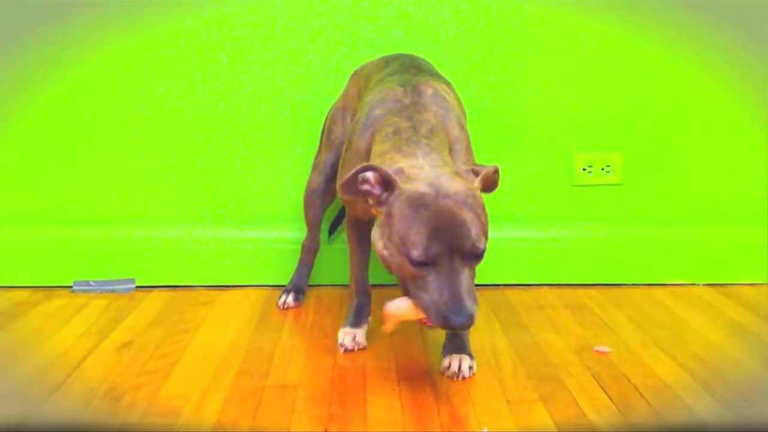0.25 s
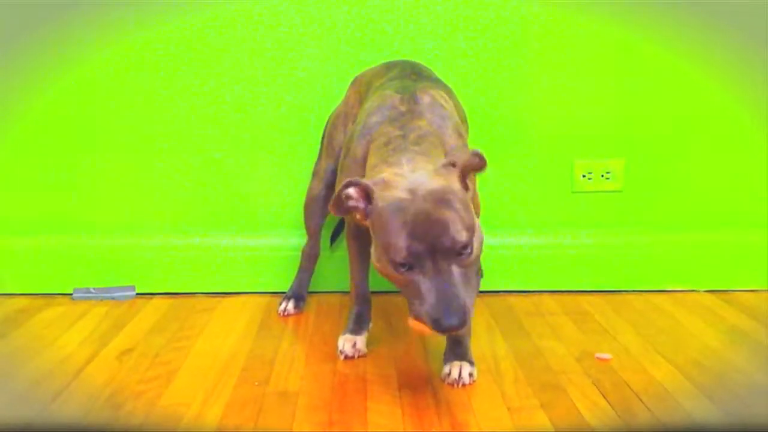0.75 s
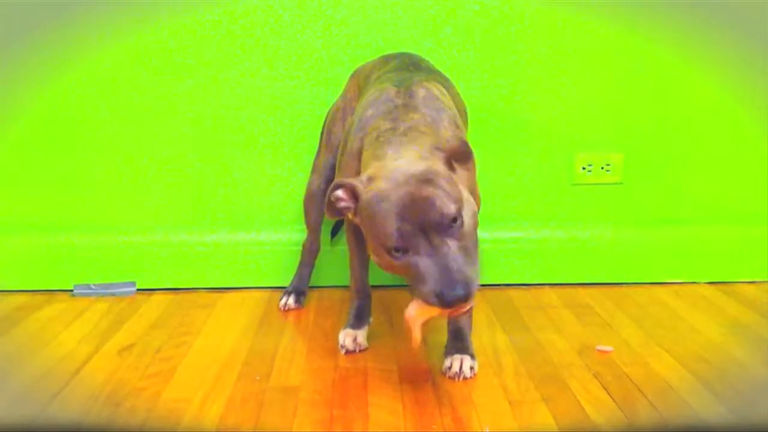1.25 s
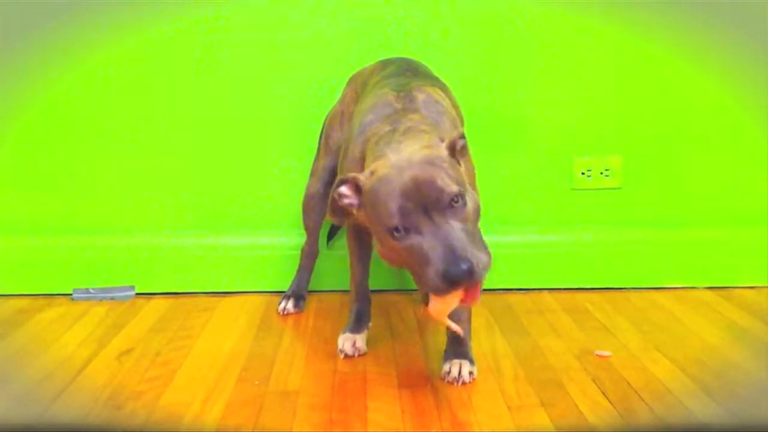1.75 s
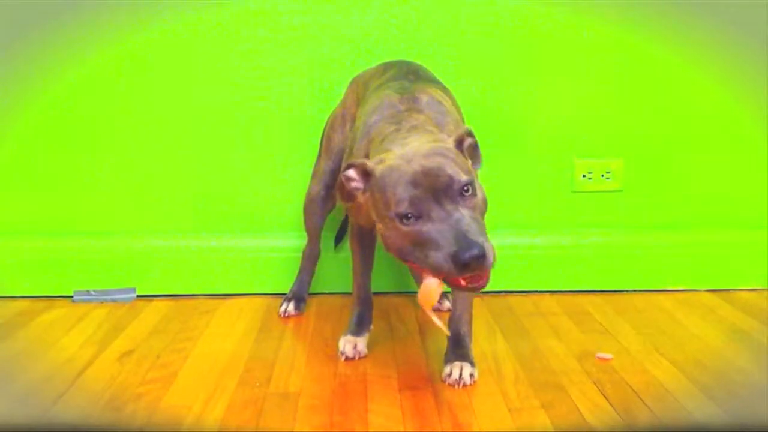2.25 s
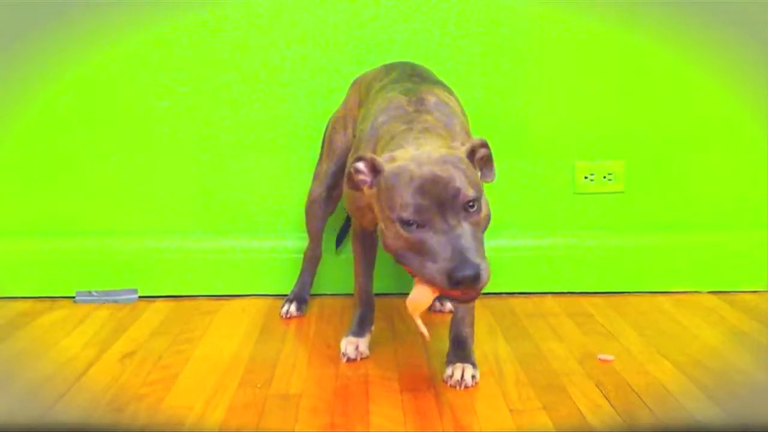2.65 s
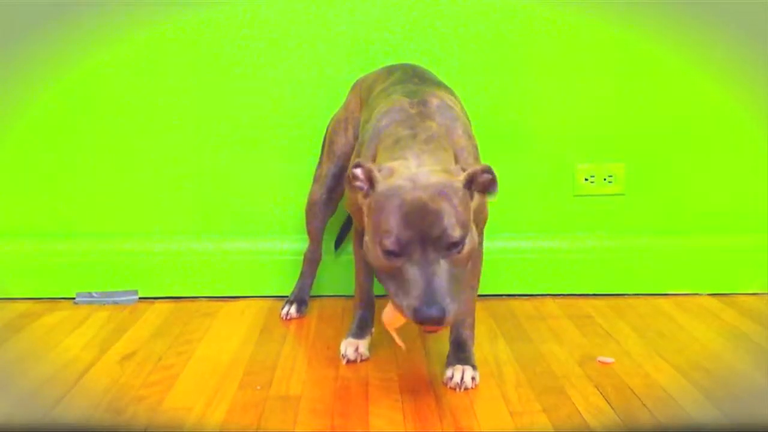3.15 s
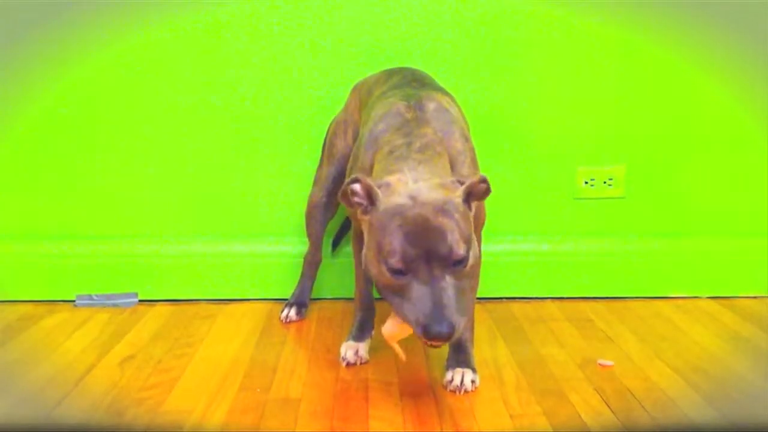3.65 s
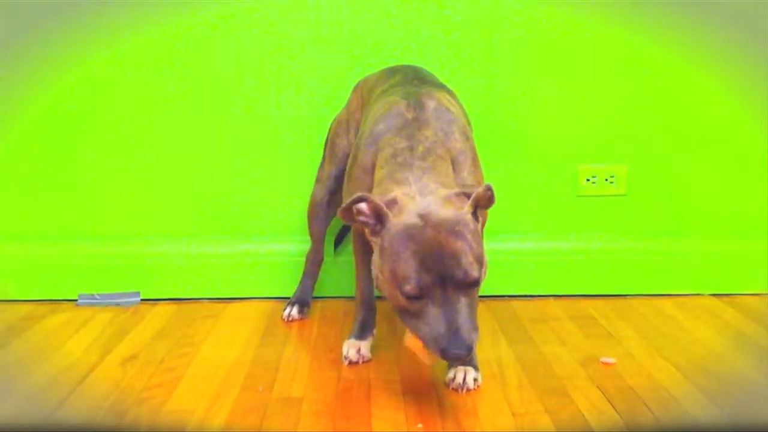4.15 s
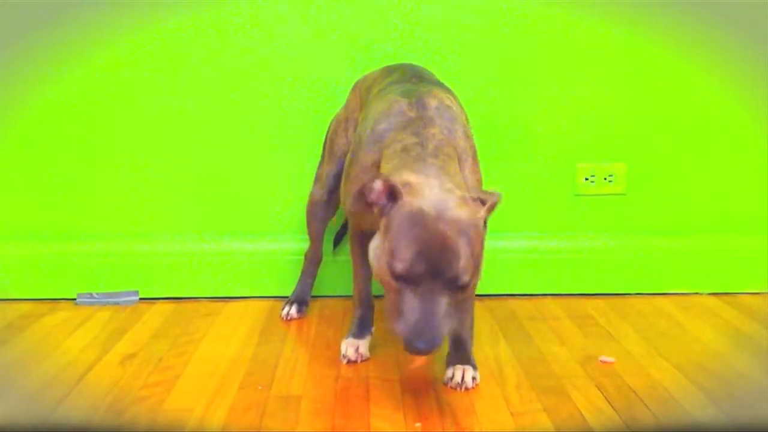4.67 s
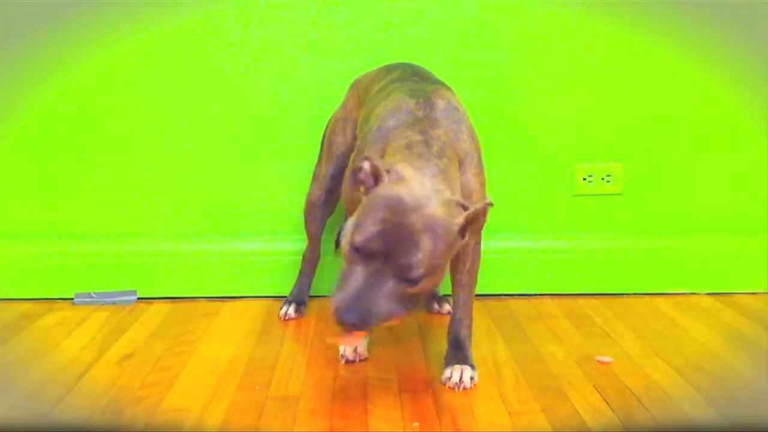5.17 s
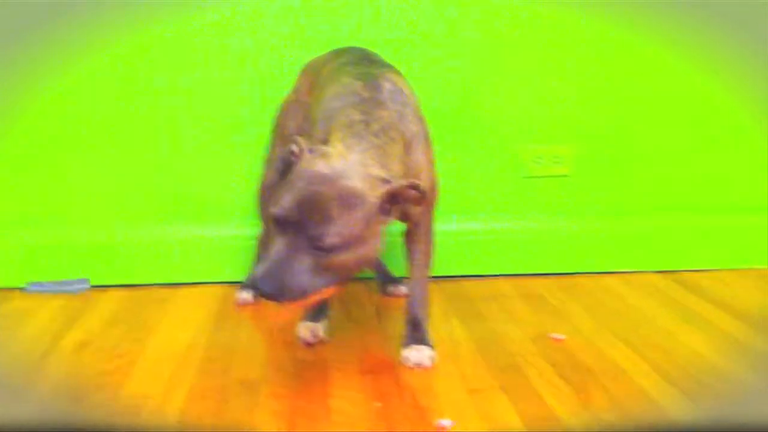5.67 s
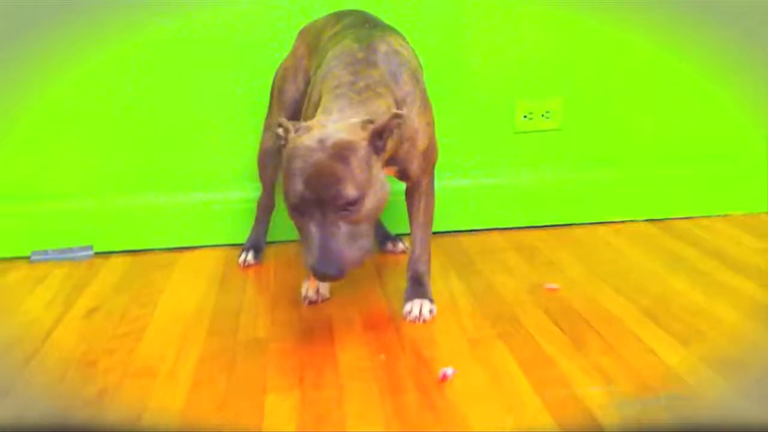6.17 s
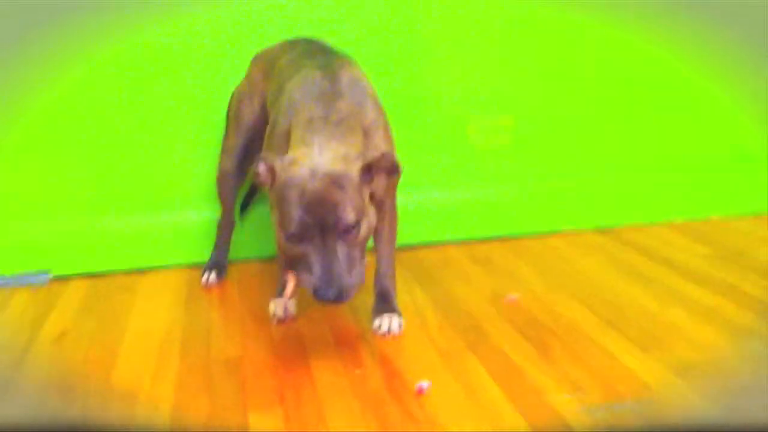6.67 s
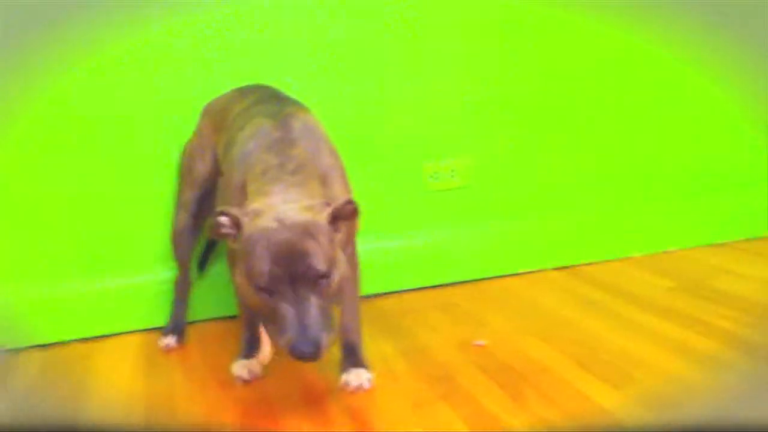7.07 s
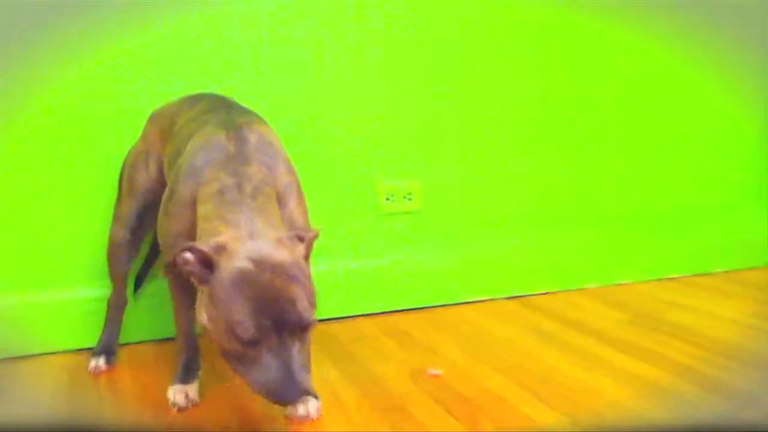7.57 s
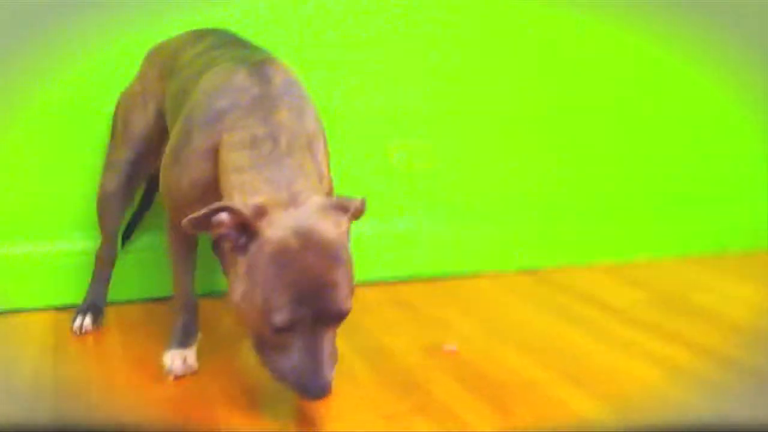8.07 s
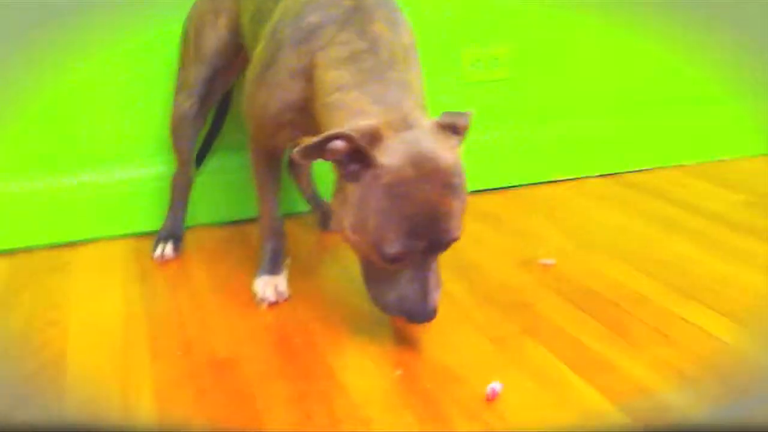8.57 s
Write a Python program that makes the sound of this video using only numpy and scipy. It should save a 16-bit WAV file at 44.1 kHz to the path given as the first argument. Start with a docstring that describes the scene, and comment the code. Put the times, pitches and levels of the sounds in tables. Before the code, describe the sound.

Irregular wet smacks, lip clicks and crackling bone come from a dog eating raw chicken indoors, each bite ringing briefly off bare walls. A few faint nose whistles slip in, then two much harder crunches. The hand-held microphone is bumped repeatedly and rustles as the last bites follow. A faint electrical hum and hiss lie underneath throughout.

```python
"""A dog chews raw chicken on a wooden floor in a bare room. From the start, bones crack, wet jaws
smack and the walls ring on, over mains hum and a soft hiss. After about 3 s, air faintly whistles
and squeaks in the dog's nose. Near 5 s the hand-held camera is first knocked, and the hardest bites
follow at 5.4 and 6.7 s. From 6 s the camera is knocked again and again and rustles in the hand.
The last bite comes near 8 s, and an airy hiss swells at the end."""
import sys
import numpy as np
from scipy import signal
from scipy.fft import rfft, irfft, next_fast_len
from scipy.io import wavfile
from scipy.ndimage import uniform_filter1d, map_coordinates

SR = 44100
rng = np.random.default_rng(int(sys.argv[2]) if len(sys.argv) > 2 else 0)


def master_out(mix):
    """Clip the mix to full scale and print it as 16-bit PCM to the path in sys.argv[1]."""
    frames = np.transpose(np.atleast_2d(mix))
    ceiling = np.clip(frames, -1, 1)
    pcm = np.round(ceiling * 32767).astype(np.int16)
    wavfile.write(sys.argv[1], SR, pcm)


N = 388962

# cracks and smacks of chewing, and one dry scuff of the hand on the camera at 6.52 s:
# (time [s], mouth peak [dB], mouth pitch [Hz], jaw peak [dB], jaw pitch [Hz],
# splinter peak [dB], splinter pitch [Hz], relative echo level [dB], crackle length [ms])
CRACKLES = [(0.004, -41, 1610, -40.5, 1220, -31, 5060, -6, 12),
            (0.174, -45, 1720, -70, 620, -45, 7060, 0, 5.6),
            (0.287, -56, 3380, -63, 1220, -59, 4940, 13.5, 7.5),
            (0.345, -47, 2080, -47, 1330, -45, 6560, 3, 3.6),
            (0.659, -51, 1820, -75, 1125, -66, 4580, 9, 2.4),
            (0.7895, -36.5, 1550, -60, 920, -45.5, 6400, 3.5, 8.4),
            (0.821, -38, 1500, -36.5, 1300, -54, 6440, -2.5, 43),
            (0.952, -40, 2370, -68, 1200, -66, 4700, -2, 4.4),
            (1.183, -54.5, 3080, -62.5, 764, -54.5, 3600, 7, 17),
            (1.317, -50, 2900, -78, 1320, -49, 4700, 5.5, 8),
            (1.547, -64, 2360, -57, 1040, -48.5, 4330, 0.5, 21),
            (1.584, -57, 2400, -61, 880, -48.5, 3700, 5.5, 12),
            (1.764, -58, 1740, -59, 1030, -51.5, 4300, 1, 13),
            (1.795, -42.5, 1640, -62, 1250, -65, 4290, -1, 8.9),
            (1.919, -47.5, 1920, -60, 776, -41.5, 3620, 5.5, 12.5),
            (1.949, -50, 2100, -56, 1200, -45, 3600, -1, 5.3),
            (1.996, -44, 2560, -49.5, 1300, -43.5, 4300, 4.5, 8.8),
            (2.154, -42, 2020, -66, 1190, -46, 3530, -0.5, 7.2),
            (2.208, -47, 1950, -73, 750, -69, 3960, 2.5, 7.6),
            (2.239, -48, 1970, -64, 1300, -42.5, 3420, 6.5, 2.5),
            (2.402, -60, 2046, -50.5, 1030, -40.5, 3780, 8.5, 6.3),
            (2.412, -34, 1890, -51, 960, -46.5, 6900, -3.5, 14),
            (2.472, -62, 2090, -73, 1290, -50, 3940, -15, 6),
            (2.531, -66, 2110, -72, 1040, -49.5, 4300, 1, 10),
            (2.607, -38.5, 1910, -50.5, 940, -41, 4600, 1, 4.7),
            (2.703, -39, 1900, -62, 870, -51, 4600, -4, 14),
            (2.842, -46.5, 1840, -67, 750, -37, 4300, 1, 9.8),
            (2.848, -39.5, 1690, -57, 720, -46, 5470, 0, 7.8),
            (2.94, -51.5, 2000, -75, 770, -45, 4000, 9.5, 3.9),
            (2.994, -54, 2300, -55.5, 1300, -49.5, 3540, 5.5, 16),
            (3.036, -45, 2260, -77, 1250, -53, 6530, -7, 8.7),
            (3.076, -63, 2310, -74, 770, -50, 6530, 5, 8.1),
            (3.129, -39, 2200, -62, 960, -42.5, 4540, -3.5, 13),
            (3.473, -53.5, 2250, -60, 1260, -57, 5000, 7.5, 7.7),
            (3.581, -45, 2330, -73, 1250, -43.5, 5040, 4.5, 6.4),
            (3.734, -43, 3210, -53.5, 1200, -44.5, 4400, 5, 7.2),
            (3.892, -56, 2290, -70, 1200, -48, 4360, 6, 4.3),
            (3.945, -41.5, 2290, -50, 845, -44, 4830, 4, 3.7),
            (4.055, -54, 2340, -67, 1250, -61, 4800, 12, 5),
            (4.078, -49, 2470, -54, 1250, -50, 5040, 2, 5.5),
            (4.22, -41, 2110, -47.5, 1220, -44, 3600, 2.5, 10.3),
            (4.398, -28, 1870, -34.5, 865, -31.5, 4410, 4.5, 4),
            (4.461, -37, 1750, -37.5, 740, -35.5, 3630, 1, 5.4),
            (4.692, -45.5, 2000, -73, 685, -51, 4450, 3.5, 11),
            (4.766, -46.5, 2700, -43, 1270, -72, 4760, 6.5, 2.1),
            (4.823, -44, 2120, -39, 1080, -45.5, 4770, -10, 18),
            (4.856, -33.5, 1970, -31, 1270, -37.5, 4900, 3.5, 4.9),
            (5.027, -47, 2350, -48, 1250, -68, 4690, 2, 41), (5.385, -45, 1920, -66, 858, -41, 3550, 5, 6),
            (5.404, -33.5, 2230, -46, 860, -37, 3480, -6, 9.5),
            (5.4343, -21, 2130, -26.5, 1270, -19.5, 3800, -5, 12),
            (5.446, -22, 2430, -22.5, 1390, -28.5, 4900, -1, 9.6),
            (5.5126, -33, 1500, -33, 860, -32, 3340, 1.5, 6.7),
            (5.642, -50, 2640, -43, 1370, -44.5, 4200, 5.5, 5.4),
            (5.707, -71, 3180, -50, 1200, -39.5, 4300, -6, 15),
            (5.916, -42, 2550, -51, 1030, -44, 4700, -1, 5.8),
            (5.929, -32, 2400, -48, 1030, -42, 6050, -7.5, 6.5),
            (5.983, -48, 2400, -60, 1100, -44, 4820, -2, 3),
            (6.077, -44, 2400, -60, 1300, -45, 4850, -8, 3),
            (6.019, -35, 2340, -49, 1380, -41.5, 4000, -4, 26),
            (6.119, -34.5, 2560, -39, 1280, -35, 4570, -7, 11),
            (6.52, -42.5, 1760, -40.5, 830, -46, 4720, -22, 33),
            (6.558, -44.5, 1820, -61, 1260, -54, 4970, 3, 29),
            (6.688, -41, 2310, -44, 1290, -41, 5030, -17, 11),
            (6.702, -46, 2260, -55, 1270, -39, 5190, -14, 5.1),
            (6.73, -20.5, 1790, -32, 1400, -19.5, 3570, 0, 6.2),
            (6.741, -32, 1700, -35, 1200, -37, 4960, -9, 4.8),
            (6.755, -33, 1770, -53, 1410, -40, 5100, -5, 17),
            (6.901, -35, 1850, -59, 766, -52, 6030, -0.5, 39),
            (7.183, -41, 2430, -47.5, 1000, -44.5, 5000, 0, 7.4),
            (7.29, -45, 1830, -48.5, 740, -53, 5060, 2, 8.2),
            (7.388, -33.5, 1900, -41, 660, -34.5, 4700, 5, 8.7),
            (7.415, -22.5, 2270, -39, 646, -27.5, 4730, -6.5, 3.2),
            (7.415, -31, 2210, -62, 680, -44, 4800, -4.5, 43),
            (7.577, -55, 2524, -54, 1430, -44.5, 5900, 6, 6.7),
            (7.621, -47, 1710, -40, 1390, -58, 4080, 0, 4.5),
            (7.753, -41, 2320, -46, 1450, -47.5, 4900, 7, 8.5),
            (7.851, -62, 2350, -47, 930, -43, 4840, -10, 4.8),
            (7.956, -51, 2040, -56, 1010, -52, 5510, 4.5, 9.6)]
# bone between the teeth: (time [s], level [dB], pitch [Hz], time to fade 60 dB [s], echo gain [dB])
BONE_KNOCKS = [(0.174, -44, 2250, 0.018, 6.5), (0.174, -41, 7340, 0.0076, -8),
               (0.285, -51, 3800, 0.008, -8), (0.79, -34, 2290, 0.013, -7), (0.832, -34, 1505, 0.049, 0.5),
               (0.834, -34.5, 955, 0.056, -3), (1.501, -45, 2300, 0.007, -8), (1.55, -42, 4630, 0.005, -8),
               (1.565, -45, 4500, 0.005, -8), (1.586, -44, 2400, 0.006, -8), (1.652, -46, 2200, 0.006, -8),
               (1.746, -45, 1900, 0.008, -8), (1.768, -41, 4430, 0.0089, -7), (1.769, -44, 1900, 0.007, -6),
               (1.9225, -41, 3500, 0.006, -10), (1.922, -46, 1900, 0.007, -10),
               (1.9505, -37, 2150, 0.0072, -10), (2.008, -42, 2200, 0.005, -8),
               (2.008, -42, 4400, 0.005, -10), (2.1554, -37, 1970, 0.0083, -8),
               (2.209, -46, 1850, 0.009, -8), (2.24, -35, 2010, 0.0094, -11),
               (2.4022, -31.5, 4300, 0.0088, -9), (2.412, -38, 2090, 0.037, -6),
               (2.607, -36, 1990, 0.01, -16), (2.7035, -33.5, 2250, 0.016, -4),
               (2.718, -42, 2300, 0.01, -8), (2.8423, -40, 4680, 0.014, -13),
               (2.848, -42, 1800, 0.007, -10), (2.941, -38, 4370, 0.0087, -6),
               (3.037, -46, 2300, 0.008, -10), (3.129, -43, 2120, 0.018, -10),
               (3.592, -43, 2300, 0.0088, -10), (3.592, -42, 5200, 0.005, -8), (3.706, -47, 3750, 0.01, -4),
               (3.729, -37, 3730, 0.014, 3), (3.85, -47, 4800, 0.004, -10), (3.893, -42, 4500, 0.005, -10),
               (3.734, -40, 2340, 0.024, 0), (3.945, -40, 2250, 0.031, -10), (4.397, -31, 871, 0.045, -1),
               (4.398, -51, 230, 0.052, -2), (4.41, -37, 1775, 0.039, 0), (4.461, -30, 1800, 0.012, -10),
               (4.61, -43, 4430, 0.0087, -8), (4.6915, -39, 4150, 0.009, -4),
               (5.4341, -18, 830, 0.016, -10), (5.4349, -35, 360, 0.061, -4), (5.4468, -34, 424, 0.022, -4),
               (5.4358, -17, 3510, 0.015, -0.5), (5.4475, -28.5, 1343, 0.033, 0.5),
               (5.448, -28, 2380, 0.02, -5), (5.642, -34.5, 3450, 0.016, -1),
               (5.7108, -34, 3960, 0.016, -7), (5.7095, -39, 3480, 0.02, 6), (5.752, -41, 3630, 0.015, -6),
               (5.801, -48, 1500, 0.006, -13), (6.7292, -21, 750, 0.011, -5),
               (6.7292, -19, 2310, 0.015, -5.5), (6.736, -31, 340, 0.025, -14),
               (6.745, -20, 5260, 0.015, -6), (6.758, -22, 5600, 0.0065, -2),
               (7.417, -28.5, 1642, 0.058, 2), (7.428, -25.5, 1747, 0.036, 1),
               (7.002, -40, 2300, 0.005, -12), (7.753, -33, 2150, 0.017, -3)]
# wet clicks at the lips: (time [s], relative click level [dB], relative sizzle level [dB])
LIP_CLICKS = [(0.1724, -47, -61), (0.2854, -59, -60), (0.6631, -64, -74), (0.714, -57, -64),
              (0.7698, -50, -54.5), (0.949, -59, -65), (1.269, -57, -62), (1.322, -55, -59),
              (1.5266, -56, -64), (1.563, -54, -59), (1.9172, -59, -76), (1.9297, -58, -73),
              (2.017, -54, -59), (2.157, -50, -57.5), (2.24, -58, -64), (2.3273, -60, -66),
              (2.4025, -59, -61), (2.4136, -51, -65), (2.5009, -50, -60), (2.5308, -55, -64),
              (2.606, -51, -58), (2.8431, -57, -69), (2.9578, -59, -68), (3.0731, -45, -67),
              (3.1105, -57, -67), (3.124, -55, -62), (3.5809, -57, -73), (3.7291, -58, -75),
              (3.9456, -56, -63), (4.0776, -57, -58.5), (4.3966, -34, -53), (4.66, -60, -62),
              (4.8221, -57, -76), (4.857, -39, -49), (5.3846, -35, -59), (5.4048, -41, -73),
              (5.4344, -20, -46), (5.512, -45, -66), (5.6402, -59, -71), (5.6773, -57, -61),
              (5.7096, -55, -60), (5.9286, -55, -74), (6.0074, -54, -60), (6.1182, -53, -72),
              (6.521, -51, -57), (6.688, -54, -55), (6.705, -38, -67), (6.729, -50, -58)]
# mouth rubs and hollow rings, low rustle, and a closing swell of airy hiss:
# (time [s], hold [s], pitch [Hz], width [Hz], level [dB])
HELD_NOISES = [(0.178, 0.04, 1570, 320, -57), (0.348, 0.019, 1270, 180, -57), (0.39, 0.04, 1300, 400, -72),
               (0.44, 0.091, 1260, 330, -64.5), (0.345, 0.12, 3800, 2500, -62.5),
               (0.31, 0.03, 2400, 1500, -64), (0.62, 0.024, 2000, 900, -70), (0.346, 0.037, 7100, 900, -62),
               (0.79, 0.018, 2200, 880, -43), (0.835, 0.063, 2070, 800, -48),
               (0.826, 0.061, 1050, 220, -57), (0.921, 0.14, 1620, 885, -59), (1.25, 0.06, 4560, 700, -64),
               (1.62, 0.047, 2200, 700, -62), (1.193, 0.32, 2250, 845, -63), (1.5, 0.16, 2210, 700, -63),
               (1.566, 0.1, 4300, 900, -65), (1.745, 0.045, 1780, 380, -59.5),
               (1.928, 0.052, 1790, 700, -58.5), (1.999, 0.11, 3230, 1250, -59.5),
               (3.39, 0.073, 3570, 800, -63), (2.41, 0.1, 2090, 250, -62), (2.705, 0.033, 2290, 250, -61),
               (3.475, 0.032, 3450, 700, -58), (3.741, 0.036, 3040, 300, -66),
               (3.85, 0.055, 2430, 800, -62), (3.945, 0.061, 2170, 300, -61),
               (4.414, 0.054, 334, 253, -56.5), (4.405, 0.12, 870, 130, -59), (4.41, 0.11, 1750, 220, -53),
               (4.43, 0.045, 198, 90, -57), (4.731, 0.028, 804, 400, -60), (4.86, 0.091, 4930, 500, -57),
               (4.906, 0.061, 304, 354, -59), (5.031, 0.059, 610, 500, -56), (5.081, 0.08, 3140, 900, -55),
               (5.101, 0.071, 5030, 600, -61), (5.204, 0.057, 2260, 1210, -57),
               (5.218, 0.038, 4480, 1000, -56), (5.303, 0.11, 390, 350, -52),
               (5.436, 0.045, 417, 444, -48.5), (5.315, 0.037, 1480, 910, -53.5),
               (5.44, 0.02, 760, 248, -42), (5.645, 0.026, 1400, 250, -55), (5.65, 0.04, 3400, 300, -60),
               (5.7, 0.039, 1300, 350, -55), (5.715, 0.03, 3600, 798, -53),
               (6.033, 0.029, 1400, 130, -55.5), (6.187, 0.046, 440, 400, -55.5),
               (6.24, 0.1, 340, 350, -61.5), (6.34, 0.14, 256, 298, -61.5), (6.735, 0.059, 3000, 1200, -42),
               (6.741, 0.065, 5100, 900, -42.5), (7.08, 0.045, 160, 150, -76),
               (7.188, 0.012, 2380, 500, -54), (7.265, 0.12, 1980, 900, -59), (7.45, 0.05, 1680, 450, -53),
               (7.777, 0.073, 2220, 1000, -54), (7.845, 0.011, 573, 600, -50.5),
               (7.931, 0.12, 256, 204, -63.5), (8.199, 0.058, 820, 350, -58), (8.244, 0.033, 350, 350, -55),
               (8.36, 0.47, 8400, 8000, -65.5)]
# ongoing noise of meat and hand: (time [s], squelch level [dB], rustle level [dB])
SQUELCH_AND_RUSTLE = [(0.0, -49.5, -59), (0.27, -63, -71), (0.73, -66.5, -70.5), (0.96, -59.5, -68),
                      (1.82, -65, -71), (2.06, -63, -71), (3.51, -63.5, -70), (3.76, -61.5, -72.5),
                      (4.05, -63.5, -68.5), (4.81, -59, -68), (4.96, -54, -58.5), (5.33, -54.5, -59.5),
                      (5.425, -62, -53), (5.46, -55, -57), (5.72, -58.5, -66), (6.09, -57, -57.5),
                      (6.66, -58.5, -60.5), (6.78, -42.5, -46.5), (7.0, -58.5, -60.5), (7.44, -51.5, -61),
                      (7.61, -60.5, -58), (8.13, -57, -59.5), (8.82, -54.5, -65.5)]
# tone colour of wet meat: (frequency [Hz], relative level [dB])
SQUELCH_COLOUR = [(350, -22), (600, -14.5), (1060, -11.5), (1230, -8.5), (1660, 2), (1960, 2), (2310, 3.5),
                  (2830, 0.5), (4680, -0.5), (7540, -9), (11500, -20.5), (12800, -45), (15500, -21)]
# whistles in the nose: (time [s], hold [s], pitch [Hz], width [Hz], level [dB])
NOSE_WHISTLES = [(3.412, 0.14, 1270, 83.33, -71), (3.879, 0.1, 1180, 110, -67),
                 (3.31, 0.017, 1240, 120, -66), (4.225, 0.03, 1150, 250, -64),
                 (4.271, 0.028, 1210, 130, -61), (5.757, 0.015, 1134, 110, -61)]
# squeaks in the nose: (time [s], length [s], first pitch [Hz], last pitch [Hz],
# relative level [dB], pitch waver [Hz])
NOSE_SQUEAKS = [(4.49, 0.11, 4430, 4230, -64, 40), (4.615, 0.065, 4130, 4040, -67, 70),
                (6.272, 0.076, 4270, 4240, -63.5, 6)]
# knocks on the camera: (time [s], thump peak [dB], thump pitch [Hz], damping [per cycle], tick peak [dB])
CAMERA_KNOCKS = [(4.913, -51, 129, 1.3, -38), (6.2082, -52, 500, 2.4, -44), (6.243, -58, 600, 2.4, -46),
                 (6.272, -56, 700, 2.4, -52), (6.309, -47, 397, 3.2, -53), (6.3375, -56, 600, 2.4, -50),
                 (6.401, -54, 800, 2.4, -47), (6.457, -60, 500, 3.1, -49), (6.524, -40, 420, 1.9, -50),
                 (6.534, -37.5, 182, 2.4, -37), (6.6376, -24, 846, 1.74, -41),
                 (6.8175, -24.5, 606, 3.8, -31), (6.8798, -35, 223, 2.6, -55), (6.9634, -17.5, 860, 9, -7),
                 (6.9659, -39.5, 247, 5.5, -32), (7.071, -50, 123, 0.95, -61),
                 (7.547, -44.5, 316, 1.8, -43), (7.692, -43, 472, 3, -44), (8.2405, -36, 607, 2.2, -57),
                 (8.247, -45, 295, 2.5, -60)]
# where the camera's shell rings: (pitch [Hz], width [Hz], relative level [dB])
SHELL_RINGS = [(4300, 2600, -2), (6360, 690, -1), (7680, 700, -5.5), (12500, 730, -6), (15200, 1200, -13)]
# tone colour of the hand on the camera: (frequency [Hz], relative level [dB])
RUSTLE_COLOUR = [(24, -61), (40, -4), (91, -14), (112, 2.5), (145, -1.5), (166, 1), (222, 1.5), (329, -1),
                 (1500, -4.5), (1950, -41), (3300, -120)]
# first echoes off the walls: (delay [s], relative level [dB])
WALL_ECHOES = [(.004, 1.5), (.009, -13.5), (0.013, 2), (.022, -9.5), (.03, -2), (0.043, -17)]
# how long the room rings: (frequency [Hz], time to fade 60 dB [s])
ROOM_FADE = [(300, 0.9), (800, 0.35), (2000, 0.47), (5500, 0.41), (12000, 0.5)]
# tones at multiples of the 60 Hz mains: (pitch [Hz], relative level [dB])
HUM_TONES = [(120, -70), (180, -68), (240, -84), (300, -80), (360, -79)]
# slow wavering of the hum: (time [s], gain of the lowest tone [dB], gain of the upper tones [dB])
HUM_GAINS = [(0, 3, 0.4), (3, 3, 1.5), (4, 1.5, 1.3), (6, -4.5, 1.8), (7, 1, 4), (7.6, -10.5, -0.5),
             (8.82, -2, 2)]
# tone colours of the room's soft hiss and its thin airy hiss: (frequency [Hz], relative level [dB])
HISS_COLOUR = [(25, 26.5), (45, 14), (70, 5), (130, 11.5), (300, -12), (900, -13), (3000, -41),
               (9000, -8.5)]
AIR_COLOUR = [(3000, -42), (6000, -8.5), (9000, -9), (12500, -4.5), (15500, -1.5)]
# loudness of the airy hiss: (time [s], level [dB])
AIR_LOUDNESS = [(0, -69), (1.0, -70), (3.6, -69), (5.0, -75), (7.4, -65), (8.1, -71), (8.82, -68)]


def crackles():
    """A bite's crackle rings mouth, jaw and bone splinter, then echoes; one hand scuff is made alike."""
    out, t = np.zeros(N), np.arange(SR // 16) / SR
    impulse = 1. * (t == 0)
    widths_hz = [(646.8, 3080), (403.2, 1920), (1100.4, 5240)]  # narrow and wide: mouth, jaw, splinter
    for start, *parts, echo_db, length_ms in CRACKLES:
        length = length_ms / 1000
        rise = 1 - np.exp(-(t / (3.4 * length ** 2)) ** 2)  # long crackles start softly
        crackle = rng.standard_normal(len(t)) * rise * np.exp(-4.2 * t / length)
        direct, colour = np.zeros(len(t)), np.zeros(len(t))
        for (db, hz), (narrow, wide) in zip(np.reshape(parts, (3, 2)), widths_hz):
            cavity = lambda f: resonance(f, hz, narrow) * resonance(f, hz, wide) * resonance(f, hz, 1.4 * hz)
            direct += with_peak(filtered(crackle, cavity), db)
            colour += amp(db) * unit(filtered(impulse, cavity))
        add(out, direct, start)
        echo = signal.fftconvolve(room_echo(rise_s=0.0029 + 0.38 * length), colour)
        echo_gain = amp(echo_db - 17) * np.sqrt(length_ms / 6)  # a longer crackle feeds the room more
        add(out, echo_gain * echo, start)
    return out


def bone_knocks(rise_cycles=0.62):
    """Bone knocks between the teeth: one hollow tone starts fast, fades and echoes in the room."""
    out, t = np.zeros(N), np.arange(SR // 8) / SR
    for start, db, hz, fade_s, echo_db in BONE_KNOCKS:
        rise = 1 - np.exp(-hz * t / rise_cycles)
        ring = amp(db - 60 * t / fade_s) * rise * np.sin(2 * np.pi * hz * t)
        add(out, ring, start)
        add(out, amp(echo_db) * signal.fftconvolve(room_echo(rise_s=0.004), ring), start)
    return out


def saliva_snaps(pitch_hz=6880, mean_delay_s=0.056, strays_per_s=5):
    """Threads of saliva snap at a crackle, soon after it or at random: a tiny high pop, then a fizz."""
    out, t = np.zeros(N), np.arange(SR // 25) / SR
    strays = rng.random((round(strays_per_s * N / SR), 2))
    delays = mean_delay_s * rng.exponential(size=(len(CRACKLES), 2))
    splinters = [(row[0], row[5]) for row in CRACKLES]  # (time [s], level [dB])
    snaps = [(start, db - 2.5) for start, db in splinters]
    for (start, db), pair in zip(splinters, delays):
        snaps += [(start + delay, db - 6.5 - 87 * delay) for delay in pair]  # later ones are fainter
    snaps += [(when * N / SR, -55 - 2.5 * np.log(chance)) for when, chance in strays]
    for start, db in snaps:
        hz = pitch_hz * np.exp(0.071 * rng.standard_normal())
        pop = short_swing(hz * t, damping=1.2)
        fading_noise = rng.standard_normal(len(t)) * amp(-60 * t / 0.083)
        fizz = filtered(fading_noise, lambda f: resonance(f, hz, 0.12 * hz))
        add(out, with_peak(pop, db) + 0.57 * amp(db) * fizz, start)
    return out


def lip_clicks(pitch_hz=9300, sizzle_fade_s=0.34):
    """Wet lips give a crisp high click, then a bursting film of saliva sizzles away."""
    out, t = np.zeros(N), np.arange(SR // 5) / SR
    for start, click_db, sizzle_db in LIP_CLICKS:
        hz = pitch_hz * np.exp(0.092 * rng.standard_normal())
        click = with_peak(short_swing(hz * t, damping=1.3), click_db - 0.5)
        grains = rng.standard_normal(len(t)) * bumps(len(t), depth_db=5, size=40)
        sizzle = unit(filtered(grains, lambda f: resonance(f, hz=8200, width_hz=4800) ** 2))
        add(out, click + amp(sizzle_db - 4.5 - 60 * t / sizzle_fade_s) * sizzle, start)
    return out


def held_noises(rise_s=0.00032, fade_s=0.15):
    """Mouth rubs, nose whistles, low rustle and closing hiss: uneven noise starts, holds and fades."""
    out, t = np.zeros(N), np.arange(SR // 2) / SR
    for start, hold_s, hz, width_hz, db in HELD_NOISES + NOSE_WHISTLES:
        rough = bumps(len(t), depth_db=3.5, size=120) * rng.standard_normal(len(t))
        band = unit(filtered(rough, lambda f: resonance(f, hz, width_hz) ** 2))
        rise = 1 - np.exp(-t / rise_s)
        loudness = amp(db - 60 * np.maximum(t - hold_s, 0) / fade_s)
        add(out, loudness * rise * band, start)
    return out


def meat_squelch():
    """Wet meat squelches in the mouth: grainy noise that swells and sinks."""
    db, _ = curves(SQUELCH_AND_RUSTLE)
    return amp(db + 0.6 * wobble(12)) * patchy_noise(SQUELCH_COLOUR, grain_db=1.2, patch_db=1.2)


def nose_squeaks():
    """Air squeaks in the nose: a thin, unsteady tone sags in pitch as it swells and fades."""
    out = np.zeros(N)
    for start, length, first_hz, last_hz, db, waver_hz in NOSE_SQUEAKS:
        n = round(length * SR)
        progress = np.linspace(0, 1, n)
        hz = first_hz + (last_hz - first_hz) * progress + waver_hz * wobble(120)[:n]
        loudness = amp(db + 3 + 2 * wobble(60)[:n])
        swell = np.sqrt(np.abs(np.sin(np.pi * progress)))
        add(out, loudness * swell * np.sin(2 * np.pi * np.cumsum(hz) / SR), start)
    return out


def camera_knocks():
    """A knock reaches the microphone through the camera's shell: a thump and a tick, with no echo."""
    out, t = np.zeros(N), np.arange(SR // 20) / SR
    shell = lambda f: sum((-1) ** k * amp(db) * resonance(f, hz, width_hz)
                          for k, (hz, width_hz, db) in enumerate(SHELL_RINGS))
    tick = filtered(1. * (t == 0), shell)
    for start, thump_db, hz, damping, tick_db in CAMERA_KNOCKS:
        thump = short_swing(hz * np.maximum(t - 0.0003, 0), damping)  # just after the tick
        add(out, -with_peak(thump, thump_db) - with_peak(tick, tick_db), start)
    return out


def hand_rustle():
    """The hand shifts on the camera and makes a low, grainy rustle."""
    _, db = curves(SQUELCH_AND_RUSTLE)
    return amp(db + 1.5 * wobble(18)) * patchy_noise(RUSTLE_COLOUR, grain_db=2.5, patch_db=1.2)


def room_echo(rise_s):
    """The room's answer to one click: a few wall echoes and a tail that builds up and dies away."""
    n = SR // 2
    hz, t, spectrum = signal.stft(rng.standard_normal(n), SR, nperseg=256)
    fade = amp(-60 * t / along(ROOM_FADE, hz)[:, None])  # each frequency fades at its own speed
    tail = signal.istft(spectrum * fade, SR, nperseg=256)[1][:n]
    tail *= 1 - np.exp(-(np.arange(n) / (SR * rise_s)) ** 2)
    tail /= np.linalg.norm(tail)
    for delay, db in WALL_ECHOES:
        strength = amp(db - 13 + rng.normal(0, 2.5)) * 0.0037 / rise_s
        tail[round(delay * SR)] += strength * rng.choice([-1, 1])
    return tail / np.linalg.norm(tail)


def mains_hum():
    """Mains power hums in slightly unsteady tones at multiples of its frequency."""
    t = np.arange(N) / SR
    low_db, upper_db = curves(HUM_GAINS)
    tones = [amp(db + 1 + 0.57 * wobble(15)) * np.sin(2 * np.pi * hz * t + 0.6 * wobble(8.1))
             for hz, db in HUM_TONES]
    return amp(low_db) * tones[0] + amp(upper_db) * sum(tones[1:])


def room_hiss(hiss_db=-67, waver_db=1.2):
    """A steady soft hiss fills the room, with a thin airy hiss wavering above it."""
    air_db = curves(AIR_LOUDNESS)[0] + waver_db * wobble(4)
    air = amp(air_db) * patchy_noise(AIR_COLOUR, grain_db=1, patch_db=2)
    return air + amp(hiss_db) * patchy_noise(HISS_COLOUR, grain_db=-1, patch_db=-3.5)


def amp(db):
    """Turns decibels into a number to multiply by."""
    return 10 ** (np.asarray(db) / 20)


def unit(x):
    """Scales a sound to an average power of 1."""
    return x / np.sqrt(np.mean(x ** 2) + 1e-20)


def with_peak(x, db):
    """Scales a sound so that its peak is at db."""
    return amp(db) * x / np.abs(x).max()


def short_swing(cycles, damping):
    """A wave that grows and dies within a few cycles."""
    return np.sin(2 * np.pi * cycles) * cycles * np.exp(-damping * cycles)


def along(points, hz):
    """Reads between (frequency [Hz], value) points, with octaves evenly spaced."""
    f, values = np.transpose(points)
    return np.interp(np.log(hz + 1), np.log(f + 1), values)


def curves(rows):
    """One value per sample for each column after the time."""
    times, *columns = np.transpose(rows)
    return [np.interp(np.arange(N) / SR, times, column) for column in columns]


def wobble(rate):
    """A smooth curve through rate random points a second."""
    return map_coordinates(rng.standard_normal(int(N * rate / SR) + 4), [np.arange(N) * rate / SR])


def bumps(n, depth_db, size):
    """A random gain whose bumps last about size samples."""
    return amp(depth_db * unit(uniform_filter1d(rng.standard_normal(n), size)))


def patchy_noise(colour, grain_db, patch_db):
    """Coloured noise, finely grainy in time, with louder and softer patches."""
    grains = rng.standard_normal(N) * amp(grain_db * wobble(150))
    spectrum = signal.stft(grains, nperseg=512)[2]
    patches = uniform_filter1d(rng.standard_normal(spectrum.shape), size=8, axis=0)  # across pitch
    patches = uniform_filter1d(patches, size=12, axis=1)  # across time
    noise = signal.istft(spectrum * amp(patch_db * unit(patches)), nperseg=512)[1][:N]
    return unit(filtered(noise, lambda f: amp(along(colour, f))))


def filtered(x, response):
    """Shapes a sound by response(frequency)."""
    n = x.shape[-1]
    padded = next_fast_len(n + 4096)
    return irfft(rfft(x, padded) * response(np.fft.rfftfreq(padded, 1 / SR)), padded)[..., :n]


def resonance(f, hz, width_hz):
    """A filter that rings at hz, where its gain is 1."""
    return 1j * f * width_hz / (hz * hz - f * f + 1j * f * width_hz)


def add(track, sound, start):
    """Mixes a sound into the track at start seconds."""
    part = track[max(round(start * SR), 0):][:len(sound)]
    part += sound[:len(part)]


def scene():
    """Dog, camera and room all reach one microphone."""
    short_sounds = crackles() + bone_knocks() + saliva_snaps() + lip_clicks()
    short_sounds += held_noises() + nose_squeaks() + camera_knocks()
    return (short_sounds + meat_squelch() + hand_rustle() + room_hiss() + mains_hum())[None]


def record(dry):
    """The sound loses deep bass and high treble, dips near 3.6 kHz and stops sharply at 15.8 kHz."""
    low_hz, high_hz, top_hz = 89, 9600, 15800

    def response(f):
        bass_cut = (1j * f / low_hz) ** 2 / (1 + 1.16j * f / low_hz - (f / low_hz) ** 2)
        bass_cut *= 1j * f / (low_hz + 1j * f)  # makes the cut steeper
        treble_cut = 1 / (1 + 1.42j * f / high_hz - (f / high_hz) ** 2)
        dip = 1 - 0.42 * resonance(f, hz=3600, width_hz=1100)
        top_cut = 1 / (1 + (f / top_hz) ** 100)
        return bass_cut * treble_cut * dip * top_cut
    return filtered(dry, response)


dry = scene()
out = record(dry)
master_out(out)
```